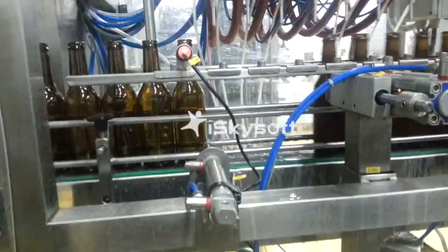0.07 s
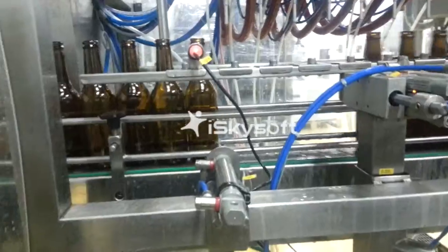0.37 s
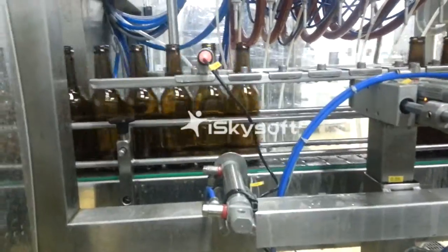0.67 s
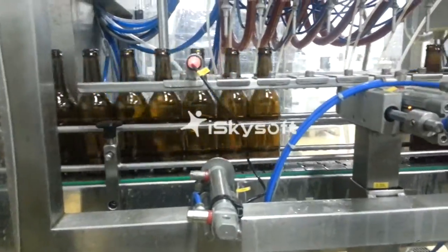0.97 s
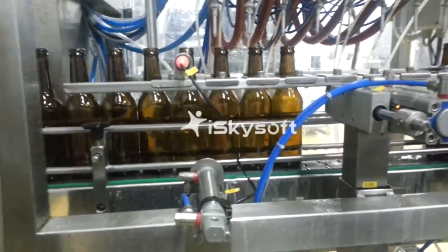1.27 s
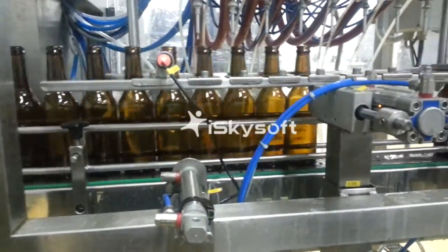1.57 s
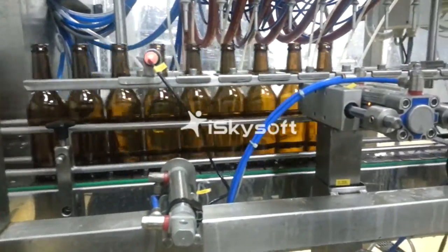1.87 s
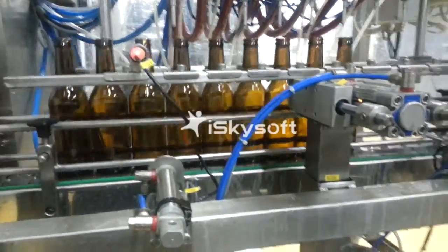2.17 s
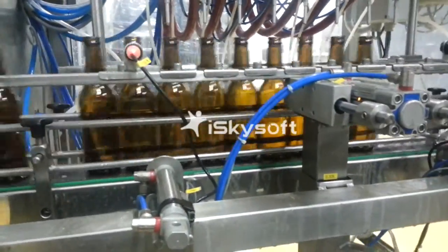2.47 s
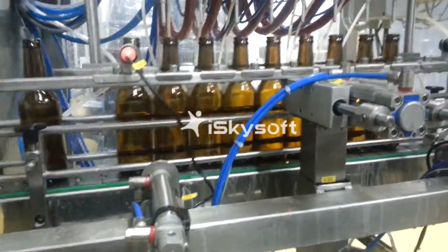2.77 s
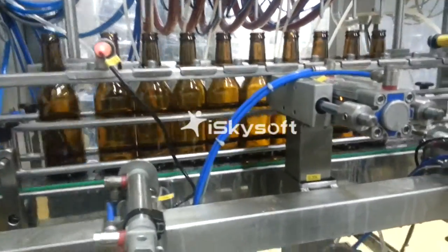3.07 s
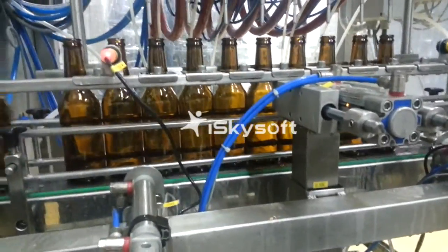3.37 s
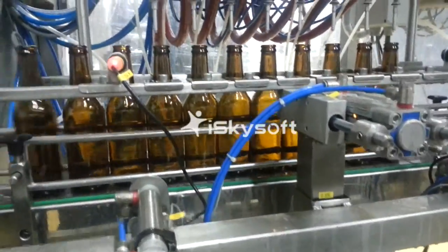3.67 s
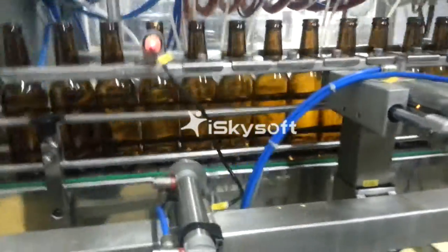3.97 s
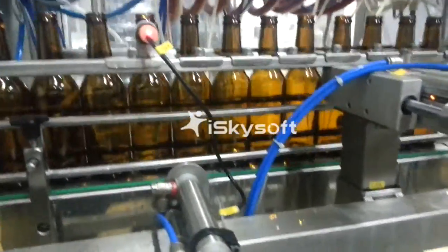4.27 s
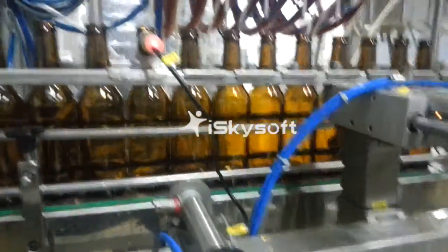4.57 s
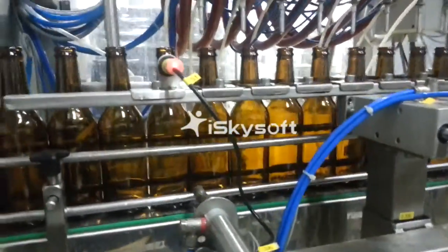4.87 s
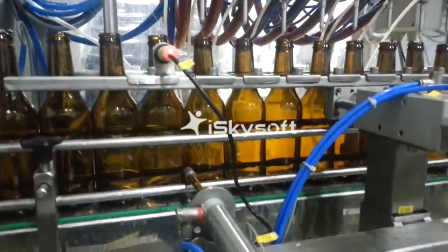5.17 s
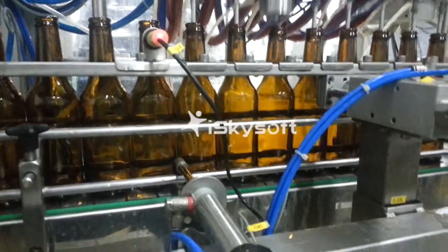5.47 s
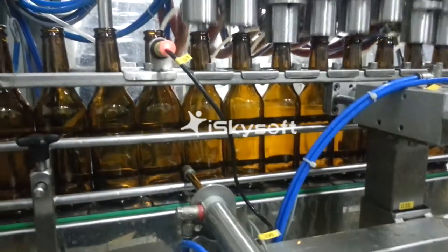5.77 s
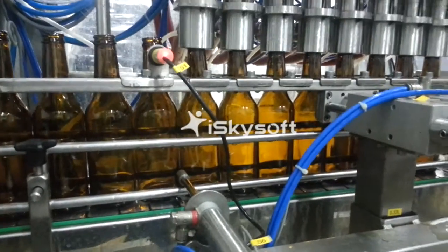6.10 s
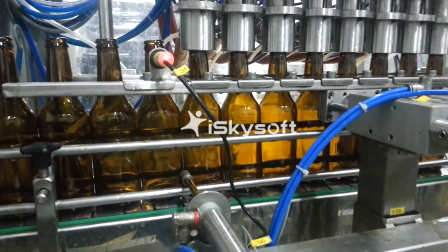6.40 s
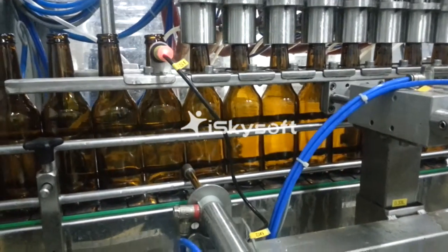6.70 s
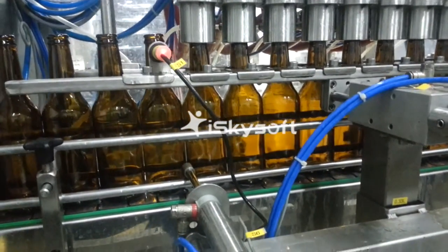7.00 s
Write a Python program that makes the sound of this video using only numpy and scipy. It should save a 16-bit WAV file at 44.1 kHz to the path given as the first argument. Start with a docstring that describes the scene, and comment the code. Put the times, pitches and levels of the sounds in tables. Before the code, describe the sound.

A bottling machine drones as glass bottles knock together and squeal on a grinding conveyor, with metal thuds and brief air hisses.

```python
"""A factory hall, with a stereo microphone close to the steel cabinet of a running bottle filler.
Glass bottles ride the conveyor in, clinking, bumping the row ahead and jostling, mostly on the left.
The chain scrapes under them, and they squeal and chatter as they stick and slip on the guide rails.
Cylinders thud into the frame and valves hiss out air over the drone of motors, pumps and fans.
The blows echo in the cabinet and the hall."""
import sys
import numpy as np
from scipy import signal
from scipy.fft import rfft, irfft, next_fast_len
from scipy.io import wavfile
from scipy.ndimage import map_coordinates

SR = 44100
rng = np.random.default_rng(int(sys.argv[2]) if len(sys.argv) > 2 else 0)


def waveform_to_disk(signal):
    """Save audio, clipped to [-1, 1], as 16-bit WAV at the path in sys.argv[1]."""
    frames = np.transpose(np.atleast_2d(signal))
    scaled = np.clip(frames, -1, 1) * 32767
    samples = np.round(scaled).astype(np.int16)
    wavfile.write(sys.argv[1], SR, samples)


N = 314874

# How busy the conveyor is. Each row: time in seconds, scraping in dB, jostling in dB.
BELT_ACTIVITY = [(.35, -38, -39.5), (.7, -28, -19.5), (1.35, -31.5, -28.5), (1.7, -25, -26),
                 (2.15, -29, -26), (2.35, -23, -23), (2.55, -29.5, -30), (2.8, -27, -31), (3.15, -25, -19),
                 (4.05, -27.5, -27.5), (4.95, -26, -25.5), (5.3, -24, -10), (5.55, -27, -29),
                 (5.98, -25, -24.5), (6.33, -38, -32.5), (7.1, -38, -45)]
# Spectrum of hard glass contact. Each row: frequency in Hz, level in dB.
CRACK_SPECTRUM = [(1000, -24), (3000, 21.5), (4500, -1), (6000, 0), (7300, 0.5), (8300, 5), (10500, 3.5),
                  (12000, -49), (14500, -31)]


def amp(db):
    """Decibels to gain."""
    return 10 ** (np.asarray(db) / 20)


def unit(x):
    """Scale to rms 1."""
    return x / np.sqrt(np.mean(x ** 2) + 1e-20)


def along(points, hz):
    """Interpolate (Hz, value) points on a log axis."""
    freqs, values = np.transpose(points)
    return np.interp(np.log(hz + 1), np.log(freqs + 1), values)


def levels(rows):
    """One gain per sample for each dB column."""
    times, *columns = np.transpose(rows)
    return [amp(np.interp(np.arange(N) / SR, times, db)) for db in columns]


def wobble(rate):
    """A smooth random curve, rate knots a second."""
    return map_coordinates(rng.standard_normal(4096), [np.arange(N) * rate / SR], mode="mirror")


def filtered(x, response):
    """Filter x by a gain that depends on frequency."""
    size = x.shape[-1]
    padded = next_fast_len(size + 8192)
    return irfft(rfft(x, padded) * response(np.fft.rfftfreq(padded, 1 / SR)), padded)[..., :size]


def sides(db):
    """Left and right gains for a level difference."""
    pair = amp(np.array([np.atleast_1d(db), -np.atleast_1d(db)]) / 2)
    return pair / np.sqrt(np.mean(pair ** 2, axis=0))


def rush(response, size=N):
    """Coloured stereo noise of rms 1, alike in the bass and leaning left in the treble."""
    # Likeness of the two channels. Each row: frequency in Hz, correlation.
    likeness = [(60, 0.53), (290, 0.86), (640, 0.77), (1300, -0.13), (3000, -0.076), (15000, -0.051)]
    # Balance at the microphone. Each row: frequency in Hz, left over right in dB.
    balance = [(100, -1), (380, 0), (700, .5), (1300, 2.5), (2400, 4.5), (4400, 3.5), (8000, 1.5),
               (15000, 0)]

    def mid_side(hz):
        angle = np.arccos(np.clip(along(likeness, hz), -1, 1)) / 2
        return response(hz) * np.array([np.cos(angle), np.sin(angle)])

    mid, side = filtered(rng.standard_normal((2, size)), mid_side)
    return unit(filtered(np.array([mid + side, mid - side]), lambda hz: sides(along(balance, hz))))


def colour(points):
    """The response of a (Hz, dB) spectrum."""
    return lambda hz: amp(along(points, hz))


def resonances(peaks):
    """The response of (Hz, half-width in Hz, dB) resonances."""
    return lambda f: sum(amp(db) / (1 + ((f - hz) / width) ** 2) for hz, width, db in peaks)


def add(out, start, x):
    """Mix x into out from start, in seconds."""
    part = out[:, max(round(start * SR), 0):][:, :x.shape[-1]]
    part += x[..., :part.shape[-1]]


def burst(t, attack, t60):
    """A quick rise and an exponential decay."""
    return (1 - np.exp(-t / attack)) * amp(-60 * t / max(t60, .005))


def ring(hz, db, t60, phase_spread):
    """Decaying modes; each reaches the two channels with its own phase."""
    t = np.arange(SR // 8) / SR
    phase = 2 * np.pi * rng.random(len(hz)) + phase_spread * rng.standard_normal((2, len(hz)))
    decay = np.exp(np.outer(2j * np.pi * hz - np.log(1000) / t60, t).astype(np.complex64))
    return np.real(amp(db) * np.exp(1j * phase) @ decay) * (1 - np.exp(-t / 0.0003))


def drives(drone_db=-27.5, swell_db=1.9, hum_db=-1, waver_hz=2.37):
    """Motors, pumps and fans: a broad drone with slightly unsteady tones."""
    # Spectrum of the drone. Each row: frequency in Hz, level in dB.
    spectrum = [(30, -28), (200, -31.5), (310, -5), (550, 0.5), (850, 2.5), (1200, -4.5), (2400, -11),
                (3700, -10.5), (5000, -19.5), (7000, -22), (9300, -30), (13000, -22.5), (14500, -32)]
    # Motor and pump tones. Each row: frequency in Hz, level in dB.
    tones = [(735, -46.5), (861, -45), (2735, -46)]
    drone = amp(drone_db + swell_db * wobble(12)) * rush(colour(spectrum))
    for hz, db in tones:
        cycles = np.cumsum(hz + waver_hz * wobble(10)) / SR + 0.12 * rng.random((2, 1))
        drone += amp(db + hum_db + wobble(9)) * np.sqrt(2) * np.sin(2 * np.pi * cycles)
    return drone


def conveyor(chatter, scrape_db=5, grain_db=1.5, grit_db=-1, rail_grit_db=-11, grit_rough_db=3):
    """The chain grinds and glass grates on glass, grittier as scraping and rail chatter grow."""
    # Spectrum of the chain's scrape. Each row: frequency in Hz, level in dB.
    spectrum = [(30, -47), (200, -28), (350, -19.5), (700, -3), (1400, 3), (2200, 1.5), (3000, -6.5),
                (4200, -4.5), (4800, -13), (7000, -23), (14500, -39)]
    scraping = levels(BELT_ACTIVITY)[0]
    pressure_db = 2.03 * wobble(40)  # the row bunches and slackens
    chain = unit(rush(colour(spectrum)) * amp(grain_db * wobble(260) + pressure_db))
    grit = unit(rush(colour(CRACK_SPECTRUM)) * amp(grit_rough_db * wobble(300) + pressure_db))
    grit_gain = amp(grit_db) * scraping ** 1.483 + amp(rail_grit_db) * chatter
    return amp(scrape_db) * scraping * chain + grit_gain * grit


def bottle(start, mismatch, scatter_db=4.0, detune=0.0065):
    """One struck bottle: its own main note, and overtones whose strength depends on where it is hit."""
    # Modes of the bottle wall. Each row: frequency in Hz, level in dB, t60 in seconds.
    wall_modes = [(3506, 5.5, 0.07), (3716, -4.5, 0.023), (4585, -16.5, 0.1), (5340, -16, 0.088),
                  (6220, -32, .065), (6560, -23.5, .06), (6810, -26.5, 0.093), (8170, -19, 0.075),
                  (9350, -26.5, 0.12), (9900, -26.5, 0.17), (10330, -41, 0.038), (11330, -25.5, 0.044),
                  (12710, -36, 0.15), (14350, -30, .055)]
    # Main note of the bottles that are touching. Each row: time in seconds, pitch in Hz.
    main_notes = [(.3, 3474), (2.3, 3496), (4.5, 3508), (6.1, 3580), (6.8, 3504)]
    hz, db, t60 = np.transpose(wall_modes)
    overtone = db < db.max()
    note = np.interp(start, *np.transpose(main_notes)) * (1 + mismatch * rng.standard_normal())
    hz = np.where(overtone, hz * (1 + detune * rng.standard_normal(len(hz))), note)
    db = db + scatter_db * overtone * rng.standard_normal(len(hz))
    return ring(hz, db, t60, phase_spread=1.46)


def jostle(count=380, touch_db=-1.0, spread_db=2.0, mismatch=0.01, lean_db=6):
    """Bottles in the row keep touching lightly, a jingle on nearly one pitch."""
    out, jostling = np.zeros((2, N)), levels(BELT_ACTIVITY)[1]
    times = (np.arange(count) + rng.random(count)) / count * N / SR
    for start, force in zip(times, rng.standard_normal(count)):
        gain = jostling[int(start * SR)] * amp(touch_db + spread_db * force)
        add(out, start, gain * bottle(start, mismatch))
    return out * sides(lean_db)


def thuds(frame_db=-7, rise_s=0.0015, panel_db=-3):
    """Stops and cylinders thud into the steel frame and ring a hollow panel."""
    # The blows. Each row: start in seconds, rattle in dB, its t60 in seconds, panel ring in dB.
    blows = [(0.244, -12.5, 0.39, -28), (.468, -12, 0.63, -47), (0.8167, -11, 0.11, -10),
             (.974, -16.5, 0.44, -22), (2.024, -3, 0.11, -13.5), (2.291, -12, 0.54, -22),
             (2.707, -14.5, 0.49, -18.5), (5.19, 1.5, 0.057, -14), (5.66, -6, 0.076, -21),
             (6.356, -14, 0.16, -22.5), (6.605, -12, 0.13, -35), (6.845, -12.5, 0.5, -32.5),
             (6.882, -14, 0.28, -35)]
    # Spectrum of the frame's rattle. Each row: frequency in Hz, level in dB.
    frame = [(40, -51), (200, -41), (330, -13.5), (600, 1.5), (900, -0.5), (1300, -1.5), (2000, -12.5),
             (4000, -31), (12000, -30)]
    # Modes of the steel panel. Each row: frequency in Hz, level in dB, t60 in seconds.
    panel = [(736, 2, 0.043), (938, 5, 0.079), (1303, -2.5, 0.097), (1584, -6, 0.098), (2280, -33, .025)]
    out, t = np.zeros((2, N)), np.arange(SR // 2) / SR
    for start, db, t60, hollow_db in blows:
        add(out, start, amp(db + frame_db) * rush(colour(frame), len(t)) * burst(t, rise_s, t60))
        add(out, start, amp(hollow_db + panel_db) * ring(*np.transpose(panel), phase_spread=0.32))
    return out


def contacts(rebound_s=.018, rebound_db=-7, rebound_slope=0.55):
    """Each bottle hits, springs back and hits again; a harder blow loses less on the rebound."""
    # Bottle against bottle. Each row: start in seconds, ring in dB, body knock in dB.
    hits = [(.26, -10, -20), (.505, -10.5, -26), (.667, -20, -30), (.755, -9, -15), (.78, -5.5, -24),
            (.952, -13, -20), (.99, -12, -20), (1.234, -12, -18.5), (1.478, -11.5, -18),
            (1.564, -13.5, -10), (1.729, -12, -31), (1.902, -18, -12), (1.969, -14, -20),
            (2.21, -12, -15.5), (2.668, -19, -9.5), (2.928, 4, -0.5), (2.954, -1.5, -15), (2.998, -2, -26),
            (3.1, -10, -12), (3.189, -11.5, -19), (3.35, 0, -3), (3.899, -0.5, -0.5), (4.16, -6, -18),
            (4.178, 2.5, -3), (4.402, -11, -15), (4.504, 2, -3), (4.572, -7.5, -16), (4.647, -13, -25),
            (4.87, -0.5, -3), (5.078, -10.5, -6), (5.17, -0.5, -10), (5.199, -0.5, -4), (5.28, -11, -8),
            (5.379, -5, -10), (5.628, -8.5, -21), (5.658, 2, -3), (5.714, -8.5, -14), (5.798, -5, -5.5),
            (5.838, -4, -13), (5.948, -1, -8.5), (6.009, -7.5, -14), (6.063, -5, -10), (6.091, -6, -20),
            (6.353, -16, -19.5), (6.6, -12, -18.5), (6.841, -9.5, -16.5), (7.086, -10, -15.5)]
    for start, db, body_db in hits:
        yield start, db, body_db
        change_db = min(rebound_db + rebound_slope * db, 0)
        yield start + rebound_s, db + change_db, body_db + change_db


def clinks(knock_db=-1, crack_db=-13.5, ring_db=-4.5, neighbour_db=-3.5, pass_on_s=0.0055,
           mismatch=0.0066, lean_db=7.0, wander_db=5.5):
    """A contact knocks dully, cracks, rings one bottle and passes down the row to two neighbours."""
    # Spectrum of the knock through base and rails. Each row: frequency in Hz, level in dB.
    knock_spectrum = [(30, -15), (200, -9.5), (400, -18.5), (900, 2), (1400, 10), (1950, 15.5), (2700, 10),
                      (3900, -15), (5000, 2), (7000, -10.5), (10000, -22), (15000, -45)]
    out, t = np.zeros((2, N)), np.arange(SR // 5) / SR
    knock, crack = rush(colour(knock_spectrum)), rush(colour(CRACK_SPECTRUM))

    def strike(noise, attack, t60):
        first = rng.integers(N - len(t))
        return noise[:, first:first + len(t)] * burst(t, attack, t60)

    for start, db, body_db in contacts():
        add(out, start, amp(body_db + knock_db) * strike(knock, attack=0.0013, t60=0.094))
        hardness_db = max(1.8 * db, -10)  # the crack grows faster with force than the ring
        add(out, start, amp(db + crack_db + hardness_db) * strike(crack, attack=0.0011, t60=0.08))
        for step in range(3):
            delay = pass_on_s * step * (1 + 0.18 * rng.standard_normal())
            gain = amp(db + ring_db + step * neighbour_db)
            pan = sides(lean_db + wander_db * rng.standard_normal())
            add(out, start + delay, gain * pan * bottle(start, mismatch * (1 + step)))
    return out


def valves(rise_s=.007):
    """Valves vent their air in bright puffs."""
    # Exhaust puffs. Each row: start in seconds, level in dB, t60 in seconds.
    puffs = [(0.463, -26, 0.43), (5.02, -32, 0.76)]
    # Spectrum of the escaping air. Each row: frequency in Hz, level in dB.
    air = [(500, -20), (2000, -13), (5000, -7), (9000, 1.5), (13000, 0), (15000, -9)]
    out, t = np.zeros((2, N)), np.arange(SR // 2) / SR
    for start, db, t60 in puffs:
        add(out, start, amp(db) * rush(colour(air), len(t)) * burst(t, rise_s, t60))
    return out


def slide_envelopes(squeal_rise_s=0.027, chatter_rise_s=0.013, ease_db_per_s=30, release_t60=0.31):
    """As a bottle slides, the squeal builds, the chatter starts fast and eases; both die on release."""
    # Slides along the rail. Each row: start and length in seconds, squeal in dB, chatter in dB.
    slides = [(1.35, 0.14, -34, -32), (1.518, 0.16, -17.5, -21), (1.891, 0.061, -16, -24.5),
              (2.0, 0.046, -22.5, -25.5), (2.278, 0.08, -19.5, -21), (2.37, 0.11, -16.5, -24.5),
              (2.633, 0.24, -19, -23.5), (3.036, 0.12, -21.5, -25), (3.26, 0.39, -22.5, -30.5),
              (3.73, 0.083, -17, -25), (4.698, .2, -25.5, -28.5), (7.071, 0.13, -26, -20)]
    squeal, chatter = np.zeros((2, N))
    for start, length, squeal_db, chatter_db in slides:
        t = np.maximum(np.arange(N) / SR - start, 0)
        release = amp(-60 * np.maximum(t - length, 0) / release_t60)
        squeal += np.minimum(t / squeal_rise_s, 1) * amp(squeal_db) * release
        chatter += np.minimum(t / chatter_rise_s, 1) * amp(chatter_db - ease_db_per_s * t) * release
    return squeal, chatter


def guide_rails(squeal, chatter, squeal_db=0.5, rough_db=1.5, swell_db=0.5, chatter_db=2.5):
    """Glass sticks and slips on the rails and excites narrow resonances."""
    # Resonances of the squeal and the chatter. Each row: centre and half-width in Hz, level in dB.
    squeal_peaks = [(1958, 17, 5.5), (2006, 8.9, 3)]
    chatter_peaks = [(3272, 13, 6), (3370, 52, -9), (3570, 40, 5), (3694, 29, -3), (3930, 28, 5),
                     (4130, 14, 0), (4200, 19, 4.5), (5260, 71, -6.5), (6020, 52, -9.5), (6700, 10, -13),
                     (7780, 210, -14)]
    tone = rush(resonances(squeal_peaks))
    tone = tone / (np.abs(signal.hilbert(tone)) + .5)  # friction limits its own swing
    tone = unit(tone * amp(rough_db * wobble(170) + swell_db * wobble(24.96)))
    return amp(squeal_db) * squeal * tone + amp(chatter_db) * chatter * rush(resonances(chatter_peaks))


def squeaks(overtone_db=-14):
    """Something rubs in the mechanism: short rising glides with one overtone."""
    # The glides. Each row: start and length in seconds, first and last pitch in Hz, level in dB.
    glides = [(4.723, 0.024, 1280, 1670, -13.5), (4.736, 0.015, 740, 830, -15.5)]
    out, t = np.zeros((2, N)), np.arange(SR // 2) / SR
    for start, length, from_hz, to_hz, db in glides:
        progress = np.clip(t / length, 0, 1)
        phase = 2 * np.pi * np.cumsum(from_hz + (to_hz - from_hz) * progress) / SR
        tone = np.sin(phase) + amp(overtone_db) * np.sin(2 * phase)
        add(out, start, amp(db) * np.sin(np.pi * progress) * tone)
    return out


def echo(x, decay, size, count=24):
    """Diffuse reflections: each frequency dies at its own speed; the colour keeps shifting slightly."""
    out, hop = np.zeros((2, N)), N // count + 1
    for k in range(count + 1):
        first = max(k - 1, 0) * hop
        part = x[:, first:(k + 1) * hop]
        fade = np.cos(np.pi / 2 * ((first + np.arange(part.shape[1])) / hop - k))
        hz, t, noise = signal.stft(rng.standard_normal((2, size)), SR, nperseg=256)
        tail = signal.istft(noise * amp(-60 * t / along(decay, hz)[:, None]), SR, nperseg=256)[1]
        add(out, first / SR, signal.fftconvolve(part * fade, tail / np.linalg.norm(tail[0]), axes=1))
    return out


def scene(cabinet_db=-6, hall_db=-11):
    """Close blows, puffs and squeaks echo in the cabinet and the hall, over the running machine."""
    # Decay of the steel cabinet and of the hall. Each row: frequency in Hz, t60 in seconds.
    cabinet = [(300, 0.09), (3500, 0.068), (12000, 0.0067)]
    hall = [(300, 0.088), (3500, 0.75), (12000, 0.073)]
    direct = clinks() + jostle() + thuds() + valves() + squeaks()
    space = amp(cabinet_db) * echo(direct, cabinet, size=SR // 6)
    space += amp(hall_db) * echo(direct, hall, size=SR // 2)
    squeal, chatter = slide_envelopes()
    return direct + space + conveyor(chatter) + guide_rails(squeal, chatter) + drives()


def record(dry, start_s=.164, ceiling=1.12, knee=4, top_hz=14650):
    """The microphone opens after a moment; the hardest blows are flattened and the top treble is cut."""
    x = dry * (np.arange(N) / SR > start_s)
    x = x / (1 + np.abs(x / ceiling) ** knee) ** (1 / knee)
    return filtered(x, lambda hz: hz < top_hz)


dry = scene()
out = record(dry)
waveform_to_disk(out)
```